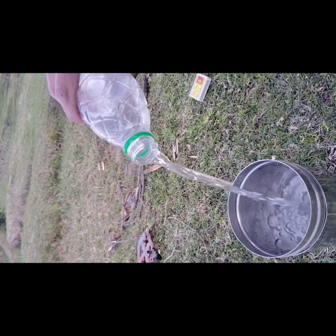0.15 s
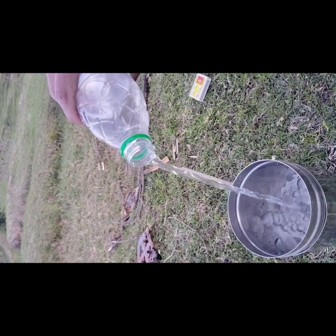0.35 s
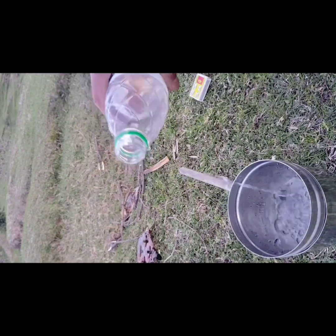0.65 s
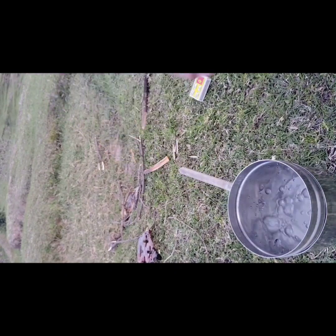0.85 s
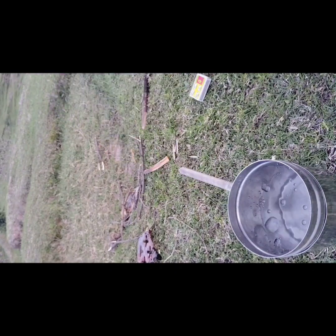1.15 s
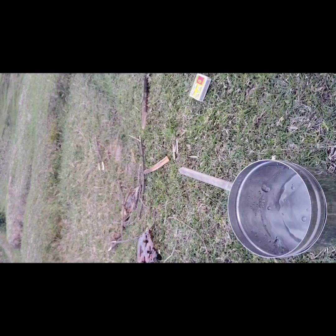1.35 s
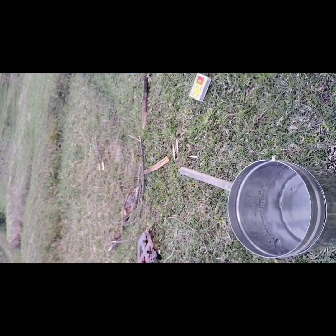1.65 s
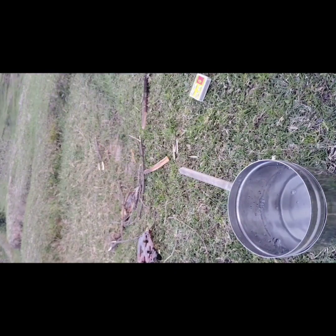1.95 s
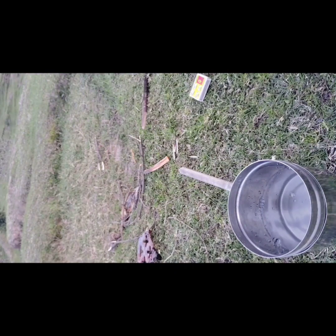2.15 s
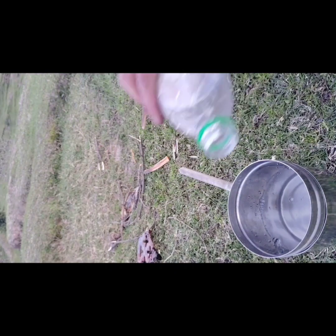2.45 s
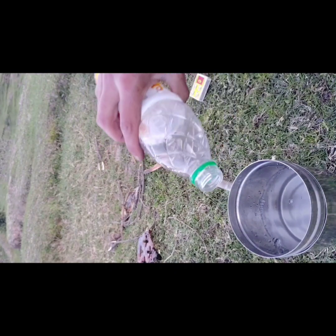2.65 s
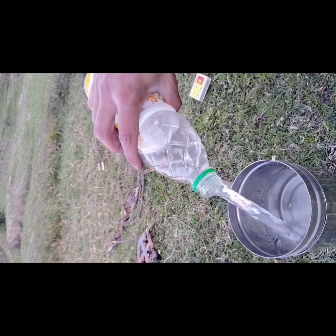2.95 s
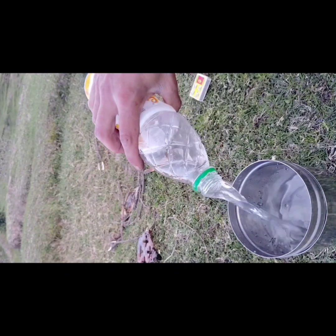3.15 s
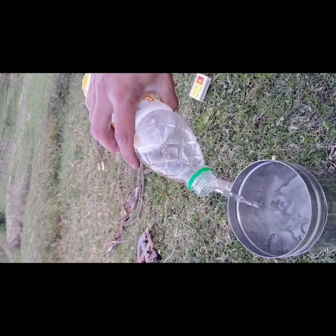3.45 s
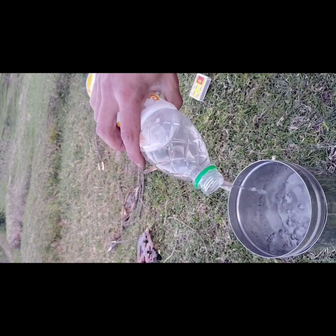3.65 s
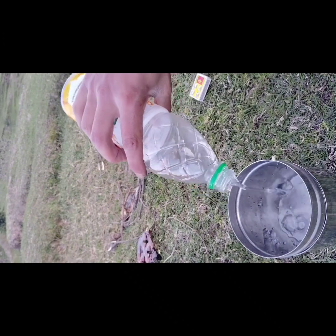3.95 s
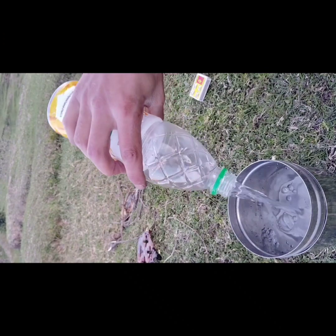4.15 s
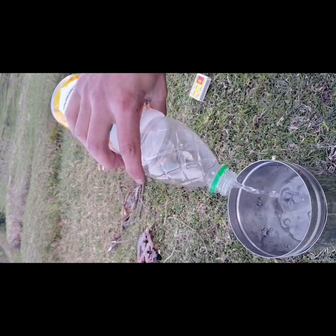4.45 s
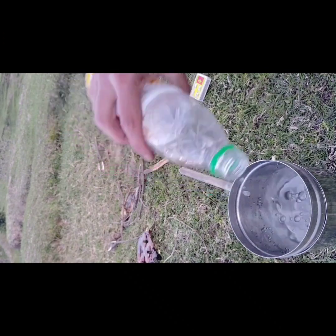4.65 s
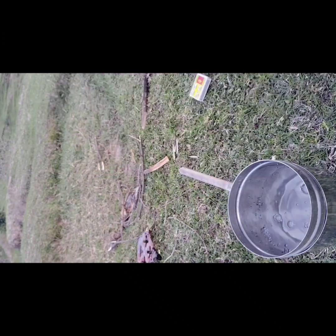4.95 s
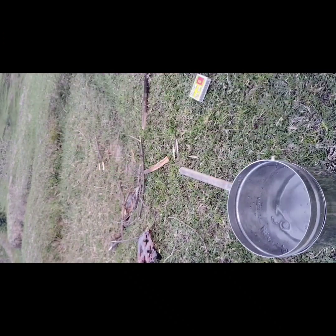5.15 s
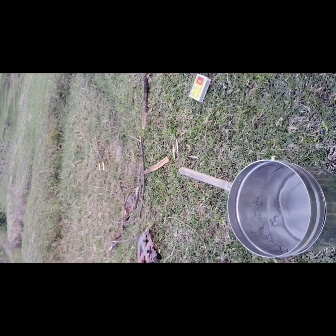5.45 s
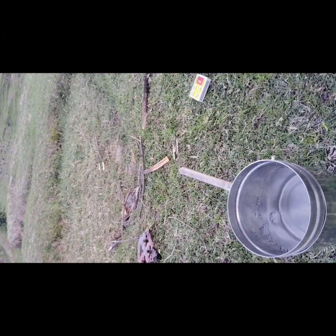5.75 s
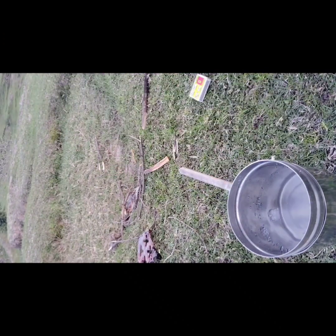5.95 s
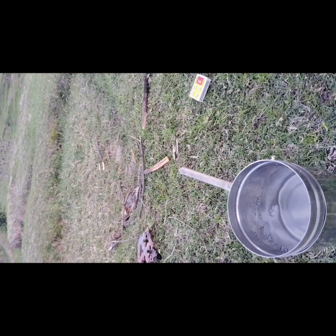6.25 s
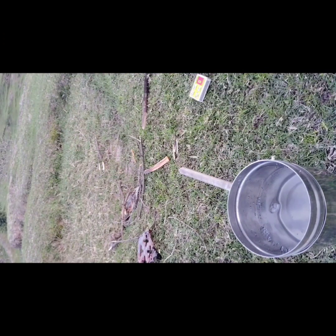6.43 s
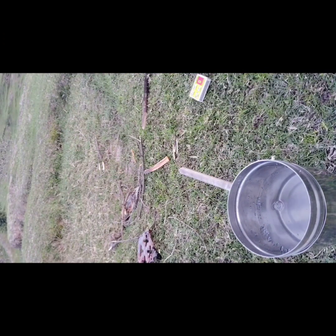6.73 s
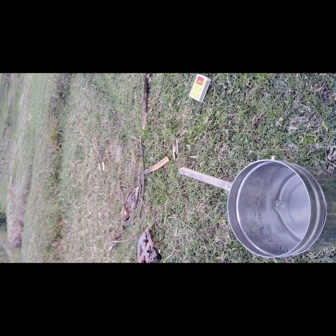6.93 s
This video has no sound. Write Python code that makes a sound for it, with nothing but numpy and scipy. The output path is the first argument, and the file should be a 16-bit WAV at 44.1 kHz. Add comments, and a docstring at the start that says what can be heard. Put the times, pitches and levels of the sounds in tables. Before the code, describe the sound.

A close hand-held microphone catches a bubbling pour of water into a metal pot, dying away under a cluster of dry taps. A light plastic crackle leads to a brighter second splash, drips and a small final spurt. Afterwards only handling remains: clicks, faint scrapes and two strong knocks, with low uneven wind rumble and quiet open-air hush throughout.

```python
"""Pouring water into a steel pot

Water gushes from a plastic bottle into a steel pot on a lawn, three times, the last one faint.
Swarms of damped sines and noise bursts make the gurgle and spray; single sines plink; the bottle crinkles.
Fingers tap, rub and knock on a hand-held camera: ringing case modes, filtered noise and low cycles.
A light breeze rumbles underneath as shaped noise, with low puffs at the microphone.
"""
import sys
import numpy as np
from scipy import signal
from scipy.fft import rfft, irfft, next_fast_len
from scipy.io import wavfile
from scipy.ndimage import map_coordinates

SR = 44100
rng = np.random.default_rng(int(sys.argv[2]) if len(sys.argv) > 2 else 0)


def store_pcm(level_fs):
    """Save levels as 16-bit WAV."""
    pcm = np.round(np.clip(level_fs, -1, 1) * 32767).astype(np.int16)
    wavfile.write(sys.argv[1], SR, np.atleast_2d(pcm).T)


N = 312669
TIME = np.arange(N) / SR  # s
AGE = np.arange(SR // 6) / SR  # s since a blow

# Tone of the air gulped into the water: f/Hz, relative level/dB
GURGLE_TONE = [(250, -13.5), (430, -5.5), (700, -13.5), (900, -5.5), (1550, -15), (1900, -19), (4000, -40)]
# Tone of the spray landing in ticks: f/Hz, relative level/dB
SPRAY_TONE = [(3000, -32), (4500, -10), (6100, -28), (7700, -20), (9300, -3), (11500, -14.5), (15500, -15)]
# Tone of the water washing over the steel: f/Hz, relative level/dB
WASH_TONE = [(1200, 2.5), (2400, 12.5), (3600, 2.5), (6400, -7), (9200, 6), (15000, -5)]
# Each big bubble drags a cloud of small ones with it; level against the steady gurgle
CLOUD_HALF_S, CLOUD_DB = 0.015, -4
# A thin dribble links the last two gushes: middle, half length, relative level
DRIBBLE_S, DRIBBLE_HALF_S, DRIBBLE_DB = 3.9, 1, -64.5


def stream():
    """The jet gulps air, washes over steel, patters and throws up ticking spray; a dribble drips."""
    flow, splash, sheet = gushes()
    clouds = np.max([np.exp(-((TIME - s) / CLOUD_HALF_S) ** 2) for s, *_ in BIG_BUBBLES], axis=0)

    gulps = grains(300, 1900, cycles=30, spread_db=12, rise=.35, count=3900, size=1200)
    gurgle = coloured(gulps + .2 * rng.standard_normal(N), GURGLE_TONE)

    drops = grains(1400, 4500, cycles=40, spread_db=18, rise=.15, count=2200, size=1000)
    patter = coloured(drops, [(1200, -13.0), (2200, 21.5), (3500, -11.5), (5500, 20)])

    smacks = crackle(rate=125, spread_db=19, ring_s=.006)
    pings = grains(4000, 15000, cycles=45, spread_db=17, rise=0, count=1400, size=400)
    spray = coloured(smacks + pings, SPRAY_TONE)

    fizz = grains(1200, 14000, cycles=48, spread_db=15, rise=.06, count=6000, size=800)
    wash = coloured(fizz + .5 * crackle(rate=400, spread_db=12, ring_s=.012), WASH_TONE)

    drips = filtered(crackle(rate=24, spread_db=8, ring_s=.006), lambda f: f / (f + 4000))
    dribble = amp(DRIBBLE_DB) * (np.abs(TIME - DRIBBLE_S) < DRIBBLE_HALF_S)

    gulping = flow * (1 + amp(CLOUD_DB) * clouds) * gurgle
    splashing = splash * (amp(-1.5) * patter + amp(15.0) * spray)
    return gulping + splashing + sheet * wash + dribble * (drips + pings)


# Tilts of the bottle: t/s, full flow/s, then relative gurgle level/dB, splash level/dB, wash level/dB,
# and t60/s of the dying gurgle and splash
TILTS = [(0, 0.55, -35, -58.5, -51.5, 1.45), (3.058, 0.12, -40.5, -62, -45, 0.53),
         (4.32, 0.1, -51.5, -69, -89, 1.1)]
SWELL_S, WASH_LINGERS = 0.013, 0.42  # the jet builds up; wash dies slower than gurgle


def gushes():
    """Gains of gurgle, splash and wash: each gush swells, holds and dwindles to a trickle."""
    flow, splash, sheet = np.zeros((3, N))
    for s, hold, gurgle_db, splash_db, wash_db, t60 in TILTS:
        swell = np.clip((TIME - s) / SWELL_S + 1, 0, 1)
        dwindle = fade(np.maximum(TIME - s - hold, 0), t60)
        flow += swell * amp(gurgle_db) * dwindle
        splash += swell * amp(splash_db) * dwindle
        sheet += swell * amp(wash_db) * dwindle ** WASH_LINGERS
    return flow, splash, sheet


# The biggest bubbles: t/s, starting f/Hz, relative level/dB, rise/(octaves per s)
BIG_BUBBLES = [(.08, 806, -39, 1.5), (0.43, 1210, -39.5, 26), (0.546, 920, -35, 10), (0.606, 982, -31.5, 0),
               (0.618, 1490, -32, 30), (.66, 718, -35.5, 7.5), (0.73, 1340, -42, -9.5),
               (0.889, 2660, -41, -14), (0.932, 1938, -36, -4), (3.052, 1041, -39, -16),
               (3.067, 377, -36.5, -0.5), (3.152, 1580, -32, 31), (3.271, 2500, -38.5, -3),
               (3.418, 1170, -44, -9.5), (3.526, 1280, -39.5, -12), (3.584, 1400, -35.5, -10),
               (3.657, 1064, -37.5, -6), (3.729, 2300, -40, 10), (3.732, 1070, -40, 2),
               (4.002, 1123, -43, -1), (4.31, 1510, -49, -1), (4.329, 1420, -46.5, -1),
               (4.346, 1280, -40, 5), (4.383, 1046, -30.5, 4.5), (4.443, 1005, -34.5, 4),
               (4.466, 1164, -36.5, 47.5), (4.537, 2050, -50.5, -5), (4.584, 1970, -44, -5),
               (4.596, 1414, -41, -13)]


def bubbles():
    """A bubble's pitch climbs near the surface or falls as it sinks; small ones die sooner."""
    out = np.zeros(N)
    for s, hz, db, rise in BIG_BUBBLES:
        pitch = hz * 2 ** np.minimum(rise * AGE, 1)  # climbs one octave at most
        tone = np.sin(2 * np.pi * np.cumsum(pitch) / SR)
        onset = 1 - np.exp(-AGE / 0.0003)
        ring = tone * fade(hz * AGE, 70) * onset  # dies over 70 cycles of the starting pitch
        slosh = amp(-2.5) * tick(hz, q=6, t60=0.015)  # water closing around it
        add(out, s, amp(db + 10.0) * (ring + slosh))
    return out


# The sharpest droplets: t/s, f/Hz, relative level/dB
SHARP_DROPLETS = [(0.2253, 4600, -30.5), (.291, 4670, -27), (0.2904, 8700, -23.5), (0.3492, 4740, -29),
                  (0.39, 9260, -22), (0.604, 8700, -35), (0.6672, 7200, -30.5), (0.729, 4400, -32.5),
                  (0.952, 10700, -36), (3.119, 8890, -27.5), (3.131, 3660, -31.5), (3.5138, 8570, -28),
                  (3.542, 9700, -34.5), (3.585, 10250, -28), (4.312, 14800, -27), (4.369, 9560, -25),
                  (4.399, 8900, -40), (4.586, 3100, -37), (4.6298, 6830, -30)]


def droplets():
    """A droplet smacks the surface with a bright tick and traps a pinhead bubble."""
    out = np.zeros(N)
    for s, hz, db in SHARP_DROPLETS:
        ping = np.sin(2 * np.pi * hz * AGE) * fade(AGE, 0.012)
        smack = tick(hz, q=2.8, t60=0.033)
        add(out, s, amp(db + 4.0) * ping + amp(db - 9.5) * smack)
    return out


# Ring of the steel pot with the water in it: f/Hz, level/dB, t60/s
POT_MODES = [(3584, -39, 0.066)]


def in_pot(x, t60, echo_db):
    """Sound bounces dully between the walls, smears a little and sets the steel ringing."""
    tail = signal.lfilter([1], [1, -.6], rng.standard_normal(len(AGE))) * fade(AGE, t60)
    echo = amp(echo_db) * tail / np.linalg.norm(tail)
    steel = sum(amp(db) * np.cos(2 * np.pi * hz * AGE) * fade(AGE, ring) for hz, db, ring in POT_MODES)
    return x + signal.fftconvolve(x, echo + steel)[:N]


# The thin bottle buckling in the grip: t/s, f/Hz, level/dB
BUCKLES = [(2.755, 9400, -39.5), (2.828, 4420, -45.5), (2.967, 10200, -43.5)]


def crinkles():
    """Small dents snap in and out of the bottle as the hand tilts it: short resonant noise."""
    out = np.zeros(N)
    for s, hz, db in BUCKLES:
        add(out, s, amp(db) * tick(hz, q=4.6, t60=0.026))
    return out


# Finger taps on the case: t/s, ring peak level/dB, ring brightness/(dB per octave),
# treble snap level/dB against the ring
FINGER_TAPS = [(1.119, -22, -4.5, -22), (1.239, -16.5, 3.5, -11), (1.316, -20, 2.5, -12.5),
               (1.334, -28, 2, -13), (1.342, -19.5, 1.5, -11), (1.354, -18.5, -5.5, -18),
               (1.3704, -11.5, 0.5, -20), (1.479, -24.5, 5, -2.5), (1.854, -42.5, -17, 9),
               (1.96, -28.5, -3.5, -15), (4.975, -21.5, 0, -22), (5.1, -14.5, -2, -5), (5.19, -30, 0, -11),
               (5.311, -12.5, 0, -12), (5.412, -36, -15, 6), (5.748, -24.5, -1, -12),
               (5.812, -20.5, -9.5, 0), (6.023, -6, -1.5, -18), (6.033, -6.5, 1, -17.5),
               (6.147, -18, 1, -33), (6.183, -21.5, 8.5, -18), (6.667, -17, 12, -20),
               (6.996, -7.5, 14, -17)]
# Modes of the camera case: f/Hz, relative level/dB, t60/s
CASE_MODES = [(946, 2, 0.049), (1272, -1, 0.0053), (1574, 6.5, 0.023), (2192, 2, 0.034), (2580, 1.5, 0.019),
              (3120, -2, 0.026), (3680, -2.5, 0.0094), (4710, -7.5, 0.003), (5210, -6.5, 0.013)]
SNAP_TOP_HZ = 14600


def taps():
    """Each tap cracks and rings the case's modes at new strengths; a nail is brighter than a fingertip."""
    rings, cracks, snaps = np.zeros((3, N))
    hz, mode_db, t60 = np.transpose(CASE_MODES)[:, :, None]
    onset = 1 - np.exp(-AGE / 0.000067)
    for s, db, bright, snap_db in FINGER_TAPS:
        tilt_db = bright * np.log2(hz / 2000)
        gains = amp(mode_db + tilt_db + 2.0 * rng.standard_normal(hz.shape))
        pitch = hz * (1 + 0.055 * rng.standard_normal(hz.shape))  # the grip shifts the modes
        tones = np.sin(2 * np.pi * (pitch * AGE + rng.random(hz.shape)))
        ring = np.sum(gains * fade(AGE, t60) * tones, axis=0)
        add(rings, s, amp(db) * ring / np.abs(ring).max() * onset)

        bass_cut = np.clip(bright / 22, 0, 1)  # a nail has little bass
        crack = signal.lfilter([1, -bass_cut], [1], rng.standard_normal(len(AGE)))
        add(cracks, s, amp(db - 6.5) * crack * fade(AGE, 0.04))

        snap = rng.standard_normal(len(AGE)) * fade(AGE, 0.016)
        add(snaps, s, amp(db + snap_db) * snap)
    cracks = filtered(cracks, lambda f: 1 / (1 + (f / 4800) ** 6))
    snaps = filtered(snaps, lambda f: 1 / (1 + (f / SNAP_TOP_HZ) ** 4))
    return rings + cracks + snaps


# Low knocks and gulps, first a low bottle glug, then a hand knock: t/s, f/Hz, relative level/dB
LOW_KNOCKS = [(4.604, 288, -25.5), (6.03, 345, -22.5)]
# The finger pad follows each tap with a push; the brighter (more nail) the tap, the less push.
# PUSH_DB is relative to the tap, on the scale of the low knocks
PUSH_LAG_S, PUSH_HZ, PUSH_DB, PUSH_PER_BRIGHT = 0.00383, 350, -13.5, -1.08


def low_knocks():
    """A bottle glug, a hand knock and the finger's push after each tap: a few low cycles each."""
    out = np.zeros(N)
    pitches = PUSH_HZ * 2 ** rng.uniform(-.3, .3, len(FINGER_TAPS))
    pushes = [(s + PUSH_LAG_S, hz, db + PUSH_DB + PUSH_PER_BRIGHT * bright)
              for (s, db, bright, _), hz in zip(FINGER_TAPS, pitches)]
    for s, hz, db in LOW_KNOCKS + pushes:
        turns = hz * AGE
        onset = 1 - np.exp(-(turns / 0.47) ** 2)
        add(out, s, amp(db + 13.5) * np.sin(2 * np.pi * turns) * fade(turns, 8.5) * onset)
    return out


# Skin sliding over the case: middle t/s, half length/s, level/dB
SKIN_RUBS = [(1.845, 0.058, -46), (2.109, 0.017, -39), (5.428, 0.098, -48), (5.767, 0.024, -42.5),
             (6.032, 0.081, -38.5), (6.373, 0.049, -48), (6.476, 0.038, -38), (6.76, 0.053, -43)]


def rubs():
    """Skin sticks and slips on the case and sets its modes buzzing."""
    slips = crackle(rate=240, spread_db=13, ring_s=.009) + .5 * rng.standard_normal(N)

    def body(f):
        """Response of the case: 280 Hz wide resonances with alternating signs."""
        return sum((-1) ** k * amp(db) * 1j * f / (hz * hz - f * f + 1j * f * 280)
                   for k, (hz, db, _) in enumerate(CASE_MODES))

    scrape = coloured(filtered(slips, body),
                      [(1600, 4), (5000, 1.5), (7000, -3), (10000, 8.5), (15000, -1)])
    strokes = sum(amp(db) * np.exp(-((TIME - s) / half) ** 2) for s, half, db in SKIN_RUBS)
    return scrape * strokes


# Puffs of breeze on the microphone: t/s, relative level/dB
BREEZE_PUFFS = [(1.126, -25.5), (1.375, -30.5), (1.595, -23), (1.633, -15), (1.807, -19.5), (1.937, -20.5),
                (2.115, -21.5), (2.233, -24.5), (2.338, -23), (3.442, -23.5), (4.939, -24), (6.513, -23)]
PUFF_HZ, PUFF_RISE_S, PUFF_T60 = 135, 0.0052, .11  # each rings briefly at the microphone port; t60 in s


def puffs():
    """Small eddies of the breeze strike the microphone: each a short, rough low swell."""
    out = np.zeros(N)
    for s, db in BREEZE_PUFFS:
        hz = PUFF_HZ * 2 ** rng.normal(0, .15)
        eddy = np.sin(2 * np.pi * hz * AGE) + .5 * tick(hz, q=2.6, t60=2.4)
        swell = fade(AGE, PUFF_T60) * (1 - np.exp(-(AGE / PUFF_RISE_S) ** 2))
        add(out, s, amp(db + 8.5) * eddy * swell)
    return filtered(out, lambda f: 1 / (1 + (f / 420) ** 4))


# Breeze and grip on the camera: t/s, rumble level/dB
RUMBLE_LEVEL = [(0.37, -34), (1.9, -33), (2.5, -37.5), (3.26, -35.5), (3.58, -41.5), (4.4, -40),
                (4.98, -38), (5.85, -41), (7.05, -36)]
# Tone of that rumble: f/Hz, relative level/dB
RUMBLE_TONE = [(20, -13), (70, -37), (102, 1.5), (160, 1.5), (250, -2.5), (500, -20), (1200, -78)]
# Tone of the open air: f/Hz, relative level/dB
AIR_TONE = [(150, -12.5), (430, 6.5), (800, -1.5), (1150, -11.5), (1600, -14.5), (4300, -31), (7000, -36.5),
            (9800, -29.5), (15000, -36.5)]
# Deep buffeting swings wider than the rumble and builds up as the breeze rises
DEEP_DB, BREEZE_RISE_S = -45, 2.43


def outdoors():
    """Breeze and grip rumble unevenly at the microphone over the steady hush of open air."""
    force = level(RUMBLE_LEVEL)
    rumble = force * coloured(rng.standard_normal(N), RUMBLE_TONE)
    deep_noise = coloured(rng.standard_normal(N), [(100, 29), (200, -87)])
    deep = amp(DEEP_DB) * unit(force ** 2) * deep_noise
    rising = np.minimum(TIME / BREEZE_RISE_S, 1) ** 2
    breeze = (rumble + deep * rising) * flutter(rate=22, depth_db=6.0)
    hush = amp(-45.0) * coloured(rng.standard_normal(N), AIR_TONE)
    return breeze + puffs() + hush


def flutter(rate, depth_db):
    """A random gain gliding in dB between rate knots a second, rms 1; depth_db sets the swing."""
    knots = rng.uniform(-1.22, 1, int(N * rate / SR) + 4)
    return unit(amp(depth_db * map_coordinates(knots, [TIME * rate], order=1)))


def grains(low_hz, high_hz, cycles, spread_db, rise, count, size):
    """A swarm of tiny bubbles at rms 1: damped sines whose pitch climbs by rise as they die."""
    when, pitch, life, strength = rng.random((count, 4)).T[:, :, None]
    t = np.arange(size) / SR
    hz = low_hz * (high_hz / low_hz) ** pitch
    t60 = cycles * (.5 + life) / hz
    phase = hz * t * (1 + rise * np.minimum(t / t60, 1))
    gain = amp(spread_db * strength ** 3) * np.sqrt(hz)
    waves = gain * np.sin(2 * np.pi * phase) * fade(t, t60)
    places = (when * N).astype(int) + np.arange(size)
    return unit(np.bincount(places.ravel(), waves.ravel(), N)[:N])


def crackle(rate, spread_db, ring_s):
    """Noise in short random bursts, rate a second, a few of them much stronger; rms 1."""
    hits = (rng.random(N) < rate / SR) * amp(spread_db * rng.random(N) ** 2)
    bursts = signal.fftconvolve(hits, fade(AGE, ring_s))[:N]
    return unit(rng.standard_normal(N) * bursts)


def tick(hz, q, t60):
    """A burst of noise in a broad resonance."""
    burst = signal.lfilter(*signal.iirpeak(hz, max(q, 1), SR), rng.standard_normal(len(AGE)))
    return unit(burst) * fade(AGE, t60)


def amp(db):
    """Decibels to gain."""
    return 10 ** (np.asarray(db) / 20)


def unit(x):
    """Scaled to rms 1."""
    return x / np.sqrt(np.mean(x ** 2) + 1e-20)


def fade(t, t60):
    """Exponential decay, 60 dB down at t60."""
    return np.exp(-np.log(1000) * t / t60)


def level(rows):
    """Gain per sample from (t/s, level/dB) rows."""
    return amp(np.interp(TIME, *np.transpose(rows)))


def filtered(x, response):
    """x times a response of frequency."""
    m = next_fast_len(N + SR // 2)
    return irfft(rfft(x, m) * response(np.fft.rfftfreq(m, 1 / SR)), m)[:N]


def coloured(x, spectrum):
    """x shaped by (f/Hz, level/dB) points on a log axis, at rms 1."""
    f, db = np.transpose(spectrum)
    return unit(filtered(x, lambda hz: amp(np.interp(np.log(hz + 1), np.log(f), db))))


def add(track, s, sound):
    """Mixes a sound in at time s."""
    part = track[round(s * SR):][:len(sound)]
    part += sound[:len(part)]


def scene():
    """Water in the pot, bottle, handling and open air at one microphone."""
    water = in_pot(stream() + bubbles() + droplets(), t60=.04, echo_db=-15)
    bottle_and_hand = crinkles() + taps() + low_knocks() + rubs()
    return (water + bottle_and_hand + outdoors())[None]


TOP_HZ = 16100


def record(dry):
    """The camera's band limit: a very steep low-pass."""
    return filtered(dry[0], lambda hz: 1 / np.sqrt(1 + (hz / TOP_HZ) ** 160))[None]


dry = scene()
out = record(dry)
store_pcm(out)
```